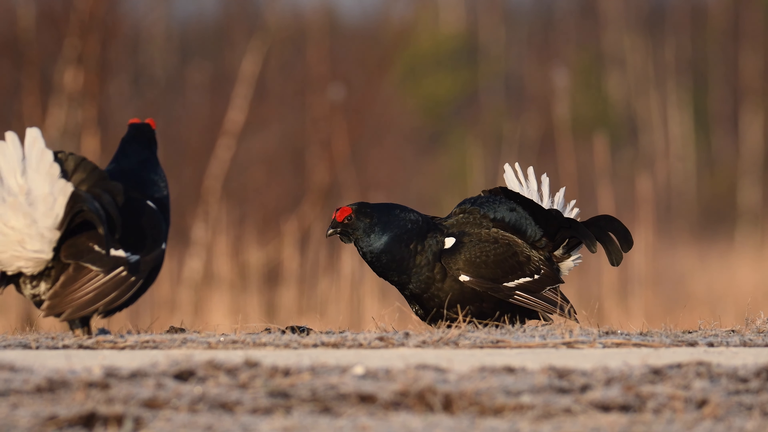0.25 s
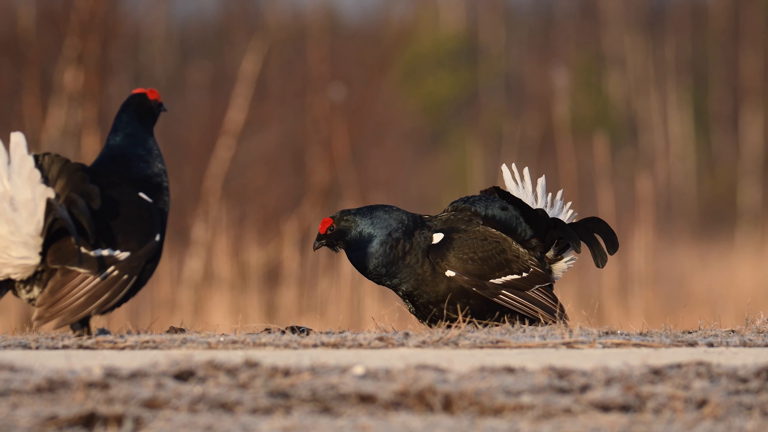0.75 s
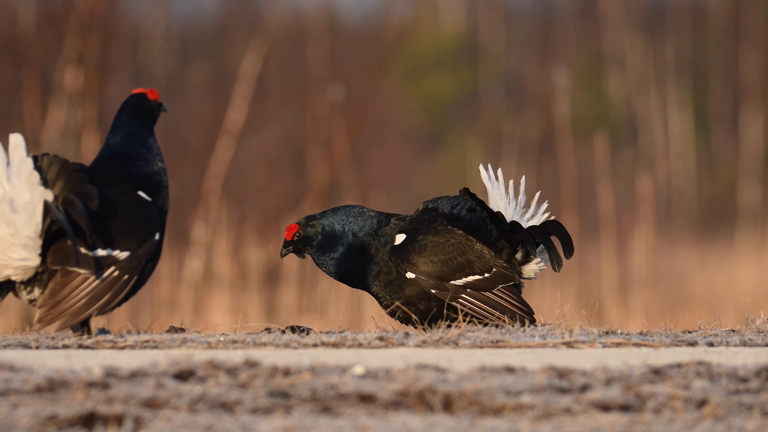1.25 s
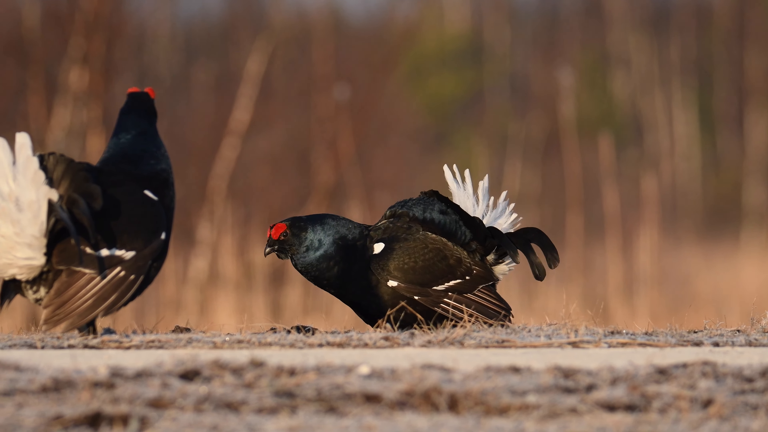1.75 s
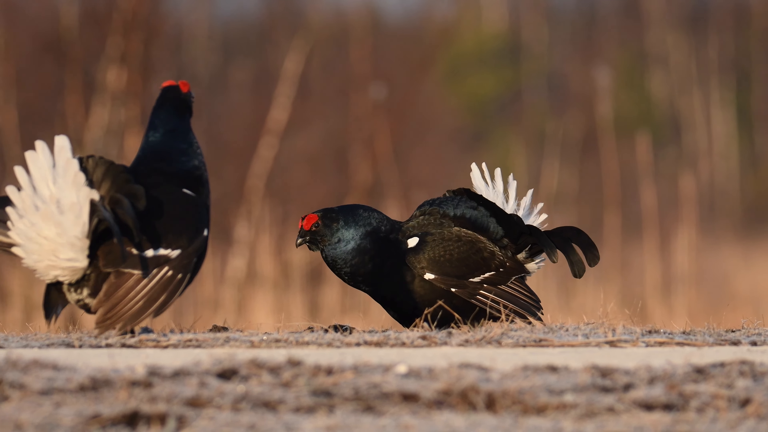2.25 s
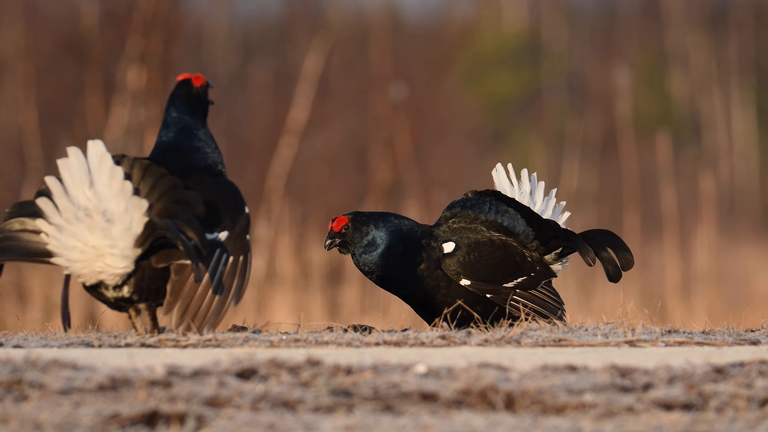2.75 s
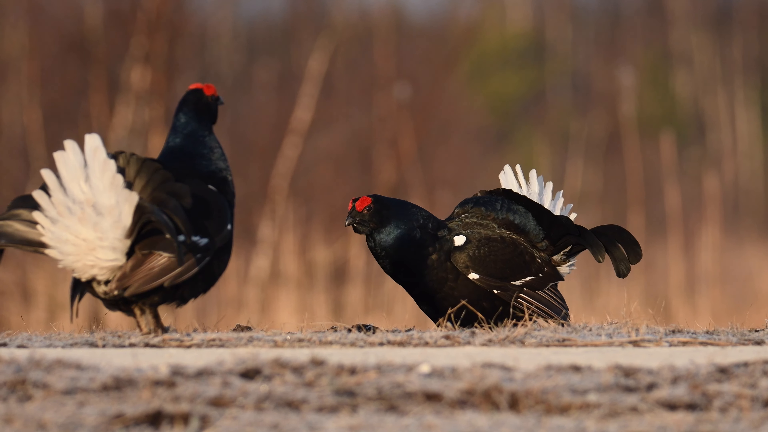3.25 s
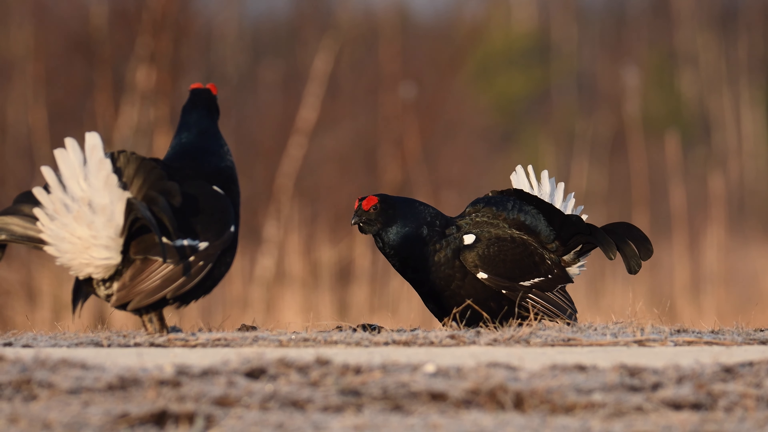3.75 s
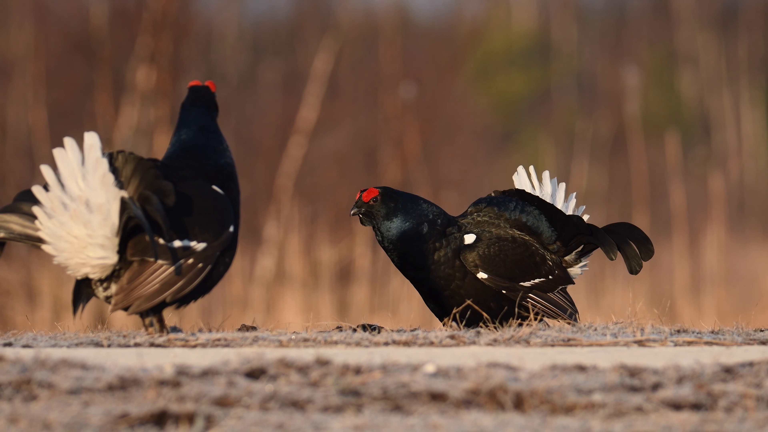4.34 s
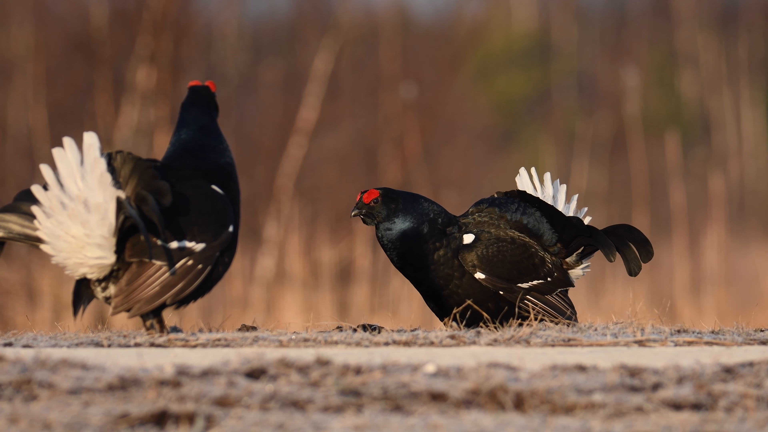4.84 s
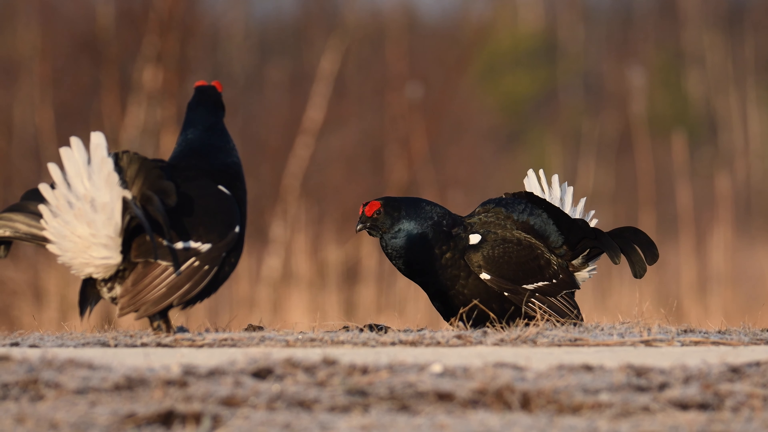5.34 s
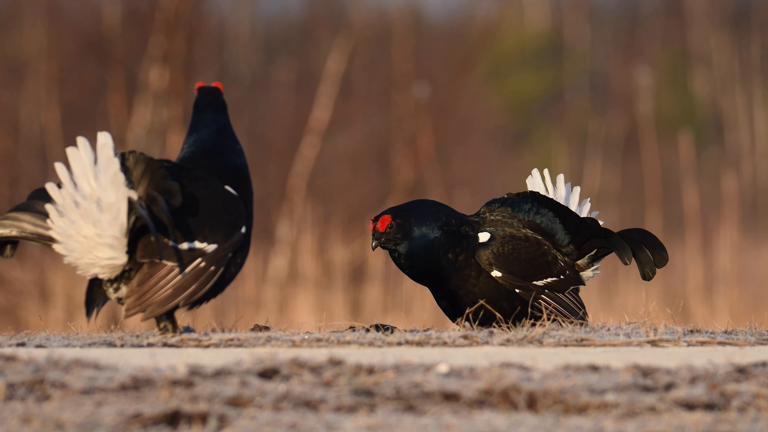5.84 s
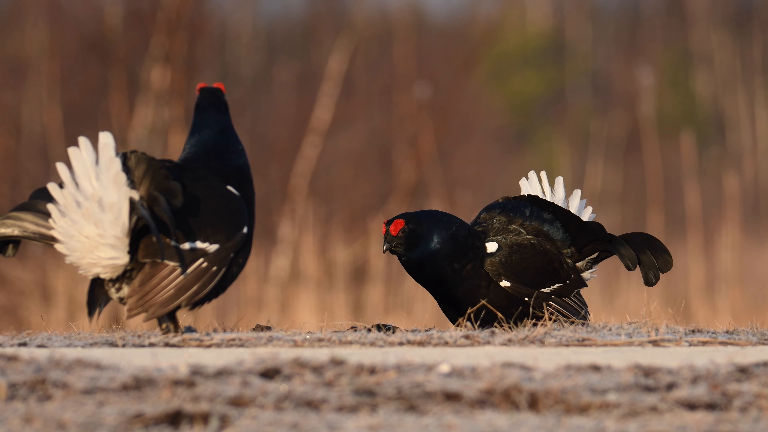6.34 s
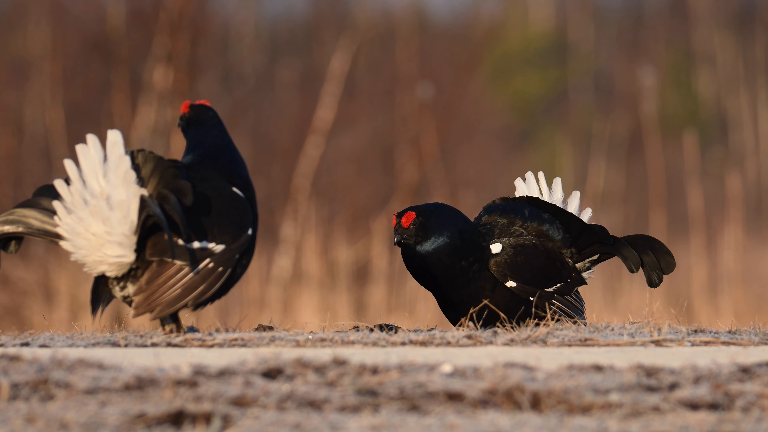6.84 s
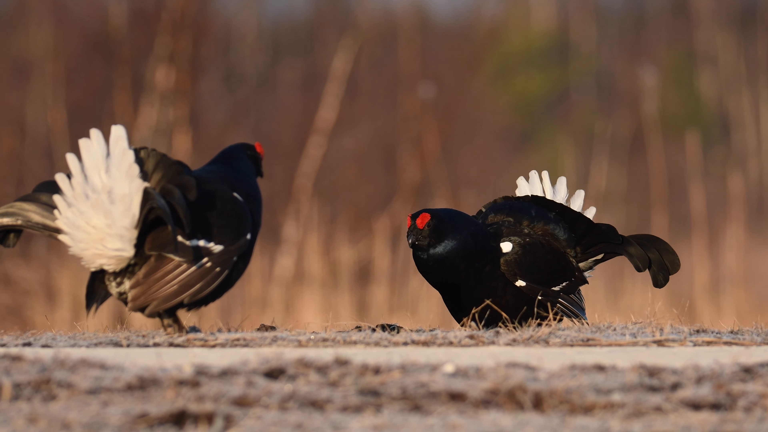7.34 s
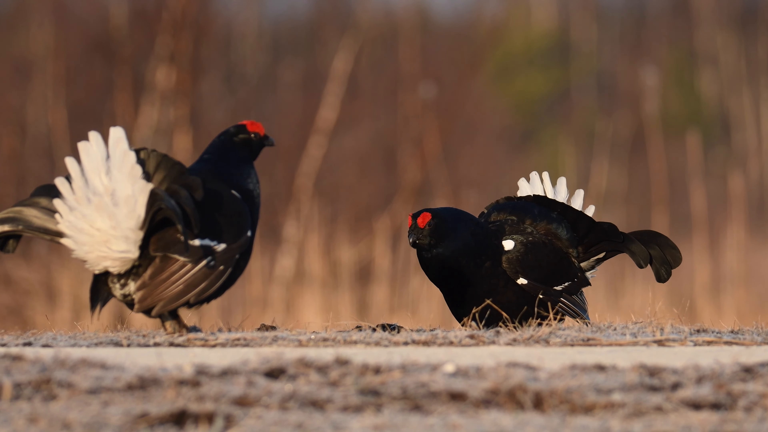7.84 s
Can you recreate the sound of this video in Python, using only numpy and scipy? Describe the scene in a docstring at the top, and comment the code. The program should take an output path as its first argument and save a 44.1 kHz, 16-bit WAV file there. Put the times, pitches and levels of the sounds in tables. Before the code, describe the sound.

Three near male grouse sing over each other, a little left of centre: even rolls of soft, round, low coos climb slightly and spill into quick bubbling phrases. About two and a half seconds in, one breathy hiss lasts just over half a second. Fainter birds bubble farther off. Open frosty ground, short soft echo, a stereo pair with low air rumble and hiss.

```python
"""Black grouse cocks at dawn

Open frosty ground, several cocks displaying left of the middle of a stereo pair of microphones.
Three near cocks overlap: even rolls of gliding coos climb in pitch into each bird's fixed closing figure.
Coos are arching tones rung through a throat sac; one blown hiss is noise through sliding resonances.
Farther cocks bubble faintly behind, over air rumble, microphone hiss and a thin electrical whine."""
import sys
import numpy as np
from scipy import signal
from scipy.fft import rfft, irfft
from scipy.io import wavfile

SR = 44100
rng = np.random.default_rng(int(sys.argv[2]) if len(sys.argv) > 2 else 0)


def transcribe(u):
    """Save the signal u as a 16-bit wav file named by the first command-line argument.

    u: samples, shape (n,) or (channels, n), limited to [-1, 1]; the rate is SR.
    q: integer samples, one column per channel.
    """
    v = np.clip(np.atleast_2d(u).T, -1, 1)
    q = np.round(v * 32767).astype(np.int16)
    wavfile.write(sys.argv[1], SR, q)


N = 356328


def amp(db):
    """dB to gain."""
    return 10 ** (np.asarray(db) / 20)


def rms_one(x):
    """Scale to unit rms."""
    return x / np.sqrt(np.mean(np.abs(x) ** 2) + 1e-20)


def in_time(rows):
    """Columns of a curve table, interpolated sample by sample."""
    s, *columns = np.transpose(rows)
    return [np.interp(np.arange(N) / SR, s, column) for column in columns]


def pan(x, db):
    """Left and right channels, the left db louder, around the same mean gain."""
    ratio = amp(db)
    return np.array([x * ratio, x]) * 2 / (1 + ratio)


def later(x, s):
    """Delay by s seconds."""
    return np.interp(np.arange(N) - s * SR, np.arange(N), x, left=0)


def band(x, low_hz, high_hz, kind="band", order=2):
    """Butterworth band filter."""
    sos = signal.butter(order, [low_hz, high_hz], kind, fs=SR, output="sos")
    return signal.sosfilt(sos, x)


# Overtones of one electrical tone. Each row: multiple of the tone, level in dB rms.
WHINE_OVERTONES = [(2, -91), (3, -93), (4, -93), (5, -95), (9, -101), (10, -100), (11, -100), (12, -101)]
WHINE_HZ = 1170.4


def whine():
    """Faint steady sine overtones from the electronics, the same in both channels."""
    t = np.arange(N) / SR
    out = 0
    for multiple, db in WHINE_OVERTONES:
        turns = round(multiple) * WHINE_HZ * t + rng.random()
        out = out + np.sqrt(2) * amp(db) * np.sin(2 * np.pi * turns)
    return out


# Steady floor at the microphones. Each row: frequency in Hz, level in dB per Hz,
# left-right likeness from 0 to 1.
FLOOR_SPECTRUM = [(14.8, -108, .4), (30.6, -101, 0.36), (73.5, -93.5, 0.47), (138, -93, 0.19),
                  (302, -94.5, 0.21), (534, -93, 0.046), (875, -100, 0.1), (2910, -104.5, 0.081),
                  (5830, -107.5, 0.0095), (6500, -110, .01), (7240, -114, 0.0084), (9900, -113, 0.0034),
                  (11800, -112, .01), (16600, -115, 0.012)]


def floor():
    """Spectrally shaped noise: air rumble partly shared by the channels, hiss almost separate in each."""
    hz = np.arange(N // 2 + 1) * SR / N + 1e-3
    at_hz, db, alike = np.transpose(FLOOR_SPECTRUM)
    db = np.interp(np.log(hz), np.log(at_hz), db)
    alike = np.interp(np.log(hz), np.log(at_hz), np.clip(alike, 0, 1))
    mid, side = rfft(rng.standard_normal((2, N))) * amp(db) * np.sqrt(SR / 4)
    mid = mid * np.sqrt(1 + alike)
    side = side * np.sqrt(1 - alike)
    return irfft(np.array([mid + side, mid - side]), N)


SWELL, SWELL_S = 0.68, 0.053   # power of the sine arch that shapes a coo; longer coos hold flatter


def coos(rows, pans_db):
    """Each coo is a pure tone whose pitch arches through three points under a smooth swell."""
    out = np.zeros((2, N))
    turns = rng.random(len(rows))
    for (s, length, first, middle, last, db), pan_db, turn in zip(rows, pans_db, turns):
        begin, end = int(s * SR) + 1, int((s + length) * SR)
        u = np.arange(begin, end + 1) / SR / length - s / length   # 0 to 1 through the coo
        # parabola through first, middle and last pitch
        hz = first * (1 - u) * (1 - 2 * u) + 4 * middle * u * (1 - u) + last * u * (2 * u - 1)
        swell = np.abs(np.sin(np.pi * u)) ** (SWELL * min(1, SWELL_S / length))
        tone = amp(db) * swell * np.sin(2 * np.pi * (np.cumsum(hz) / SR + turn))
        at = np.arange(max(begin, 0), min(end, N))
        out[:, at] += pan(tone[at - begin], pan_db)
    return out


# Loudness of the farther cocks together, before the low-pitch loss and the ground.
# Each row: time in seconds, gain in dB.
FAR_LEVEL = [(0, -54), (.2, -58), (.26, -90), (.36, -90), (.42, -57), (2.4, -58), (3.3, -59.5), (4.3, -61),
             (4.6, -66), (5.0, -59), (5.6, -62.5), (6.5, -56.5), (7.5, -56.5), (7.66, -78), (7.75, -54.5),
             (8.08, -56.5)]
FAR_PER_S, FAR_LOW_HZ, FAR_HIGH_HZ = 50.0, 349.9, 550.5   # mean coos per second; range of middle pitch
FAR_FALL, FAR_LENGTH_S = 0.21, 0.0403   # last pitch below the middle, as a share; length before variation
FAR_PAN_DB = 0.5


def far_cocks():
    """Distant bubbling: falling coos at random moments, pitches, strengths and sides."""
    gap, pitch, length, strength, side = rng.random((800, 5)).T
    start = np.minimum(np.cumsum(2 * gap / FAR_PER_S) - .05, N / SR)
    length_s = FAR_LENGTH_S * (.6 + length)
    hz = FAR_LOW_HZ * (FAR_HIGH_HZ / FAR_LOW_HZ) ** pitch
    rows = np.c_[start, length_s, hz * 1.05, hz, hz * (1 - FAR_FALL), 6.0 * strength]
    bubbling = coos(rows, FAR_PAN_DB + 19.0 * (side - .5))
    return amp(in_time(FAR_LEVEL)[0]) * rms_one(bubbling)


# Four sliding resonances of windpipe and beak. Each row: time in seconds, then for each resonance
# its centre in Hz and its gain in dB.
HISS_RESONANCES = [(2.56, 1900, -78, 2600, -78, 3500, -84, 4970, -88),
                   (2.575, 1850, -55, 2720, -62, 3460, -65.5, 4920, -76),
                   (2.64, 1758, -61, 2965, -61.5, 3450, -57, 4870, -68),
                   (2.72, 1636, -63, 2950, -66, 3495, -70, 5050, -75),
                   (2.775, 1610, -69, 2915, -68, 3500, -80, 5200, -77),
                   (2.82, 1610, -66, 2880, -67, 3520, -78, 5500, -74),
                   (2.9, 1660, -65.5, 2906, -74, 3510, -65, 5730, -70.5),
                   (3.05, 1935, -63.5, 2794, -73, 3560, -64.5, 5850, -63),
                   (3.11, 2300, -60, 2950, -58, 3350, -66, 5900, -66.5),
                   (3.165, 2450, -60, 2835, -61, 3200, -72, 5990, -73),
                   (3.2, 2440, -87, 2740, -83, 3100, -90, 5900, -95)]
# One value for each resonance: bandwidth of each of its two equal poles in Hz.
HISS_POLE_WIDTHS_HZ = [340, 400, 420, 1400]
# One value for each resonance: left over right in dB.
HISS_PANS_DB = [1, -1.5, -1.5, -2]
HISS_SPILL_DB, HISS_WIDE_DB = -10.5, -6   # breath between the resonances; scattered part


def blown_hiss():
    """Turbulent breath coloured by resonances that slide as neck and beak move."""
    curves = in_time(HISS_RESONANCES)
    out = 0
    for hz, db, width_hz, pan_db in zip(curves[::2], curves[1::2], HISS_POLE_WIDTHS_HZ, HISS_PANS_DB):
        r = np.exp(-np.pi * width_hz / SR)
        white = rng.standard_normal((3, N)) + 1j * rng.standard_normal((3, N))
        # narrow noise carried along the moving centre
        narrow = signal.lfilter([1], [1, -2 * r, r * r], white)
        carrier = np.exp(2j * np.pi * np.cumsum(hz) / SR)
        rung = rms_one((narrow * carrier).real)
        out = out + amp(db) * (pan(rung[0], pan_db) + amp(HISS_WIDE_DB) * rung[1:])
    effort = amp(curves[1]) + amp(curves[3]) + amp(curves[5])
    spill = rms_one(band(rng.standard_normal(N), 1900, 3540))
    out = out + amp(HISS_SPILL_DB) * effort * spill
    t = np.arange(N) / SR
    return out * (t > HISS_RESONANCES[0][0]) * (t < HISS_RESONANCES[-1][0])


# Even rolls of falling coos. Each row: first coo in seconds, last coo in seconds, spacing in seconds,
# coos from the end at mid-climb, low pitch in Hz, top pitch in Hz, low level in dB, top level in dB
# (before creep, variation and the throat sac), then for the top coo its length in seconds
# and its first and last pitch as ratios to its middle.
ROLL_SHAPES = [(0.027, 0.172, 0.0724, 4.2, 457, 595.6, -20, -31.5, 0.034, 1, 0.75),
               (0.8315, 1.422, 0.0737, 3.9, 445.6, 568.2, -39.5, -33, 0.07, 1.104, 0.79),
               (2.048, 2.6, 0.069, 3.66, 473, 583, -38.5, -39.5, 0.079, 0.99, 0.62),
               (2.143, 3.018, 0.0795, 3.72, 526, 597.4, -44, -31.5, 0.044, 0.936, 0.59),
               (4.399, 5.486, 0.0724, 3.24, 492, 601, -37.5, -36, 0.056, 0.94, 0.74),
               (4.903, 6.009, 0.0737, 3.62, 449.3, 565, -39, -31, 0.059, 1.073, 0.65),
               (6.393, 7.136, 0.0742, 2.4, 477, 601.4, -38, -37, 0.065, 1.09, 0.63)]
CLIMB_WIDTH_COOS = 0.73   # how gradually a roll climbs from low to top
CREEP_HZ, CREEP_DB = 3.0, .09   # slow gain from coo to coo
LOW_COO_S, LOW_ENTRY, LOW_EXIT = 0.049, 1.057, 0.84   # coo before the climb: length, end pitch ratios
LOW_VARY_DB = 3.0   # spread of the uneven coos before the climb


def rolls():
    """Evenly spaced coos creep up, then climb in pitch and change level over the last few."""
    rows = []
    for first_s, last_s, spacing, climb, low_hz, top_hz, low_db, top_db, *top_shape in ROLL_SHAPES:
        left = np.arange(round((last_s - first_s) / spacing) + 1)   # coos still to come
        up = 1 / (1 + np.exp((left - climb) / CLIMB_WIDTH_COOS))   # 0 low, 1 top
        hz = low_hz + (top_hz - low_hz) * up - CREEP_HZ * left
        low_shape = LOW_COO_S, LOW_ENTRY, LOW_EXIT
        length, entry, leave = [low + (top - low) * up for low, top in zip(low_shape, top_shape)]
        uneven_db = LOW_VARY_DB * (1 - up) * (rng.random(len(left)) - .5)
        db = low_db + (top_db - low_db) * up - CREEP_DB * left + uneven_db
        rows += list(np.c_[last_s - spacing * left, length, hz * entry, hz, hz * leave, db])
    return rows


# Closing figure of the song, one list for each of three near cocks. Each row: start in seconds from
# the figure's reference moment, length in seconds, first, middle and last pitch in Hz,
# peak level in dB; a rendition then changes times and level.
CLOSING_FIGURES = [
    [(-0.144, 0.076, 538, 538, 430, -36.5), (-0.08, 0.0133, 367, 457, 299, -35.5),
     (0.002, 0.0256, 546, 575, 323, -33.5), (0.109, 0.031, 439, 496, 686, -34),
     (0.155, 0.0256, 515, 592, 276, -29.5), (0.2, 0.065, 458, 522, 370, -36),
     (0.281, 0.0406, 307, 501, 682, -33), (0.322, 0.107, 599, 601.7, 614, -35),
     (0.423, 0.038, 601, 574.5, 495, -32.5), (0.515, 0.064, 540, 493, 480, -35),
     (0.575, 0.043, 438, 484, 430, -33.5), (0.628, 0.085, 437, 608.5, 323, -33),
     (0.739, 0.013, 660, 558, 603, -34), (0.804, 0.0492, 423.5, 582.3, 626, -33.5),
     (0.85, 0.017, 530, 594, 280, -29.5), (0.9, 0.052, 400, 588.5, 413, -30.5),
     (0.951, 0.023, 502, 602, 603, -35.3), (0.992, 0.026, 560, 586, 413, -30),
     (1.232, 0.021, 632, 592, 563, -37)],
    [(-0.147, 0.059, 538, 464.6, 544, -32.5), (-0.103, 0.027, 456, 481, 410, -29),
     (-0.001, 0.0287, 560, 552, 319, -29), (0.117, 0.0573, 398.5, 565.3, 522, -29.5),
     (0.154, 0.0202, 600, 499, 419, -31), (0.21, 0.052, 383, 482, 393, -31.5),
     (0.301, 0.036, 373, 577.4, 436, -28), (0.333, 0.086, 579, 608, 615, -37.5),
     (0.421, 0.031, 615, 570, 537, -28.5), (0.532, 0.033, 565, 557, 377, -31.5),
     (0.612, 0.048, 654, 596, 578, -33), (0.665, 0.0298, 638, 542, 316, -30.5),
     (0.733, 0.0403, 311, 523, 600, -37.1), (0.816, 0.052, 414, 565.7, 403, -35.5),
     (0.832, 0.0444, 533, 542, 380, -34), (0.903, 0.057, 388, 519.6, 395, -30.5),
     (0.959, 0.023, 543, 545, 657, -32.5), (0.984, 0.0527, 690, 508, 473, -31),
     (1.23, 0.0372, 588, 440, 307, -35)],
    [(-0.142, 0.097, 442, 507, 454, -34), (-0.082, 0.0235, 570, 440, 282, -40),
     (-0.012, 0.046, 395, 595, 557, -33.5), (0.107, 0.0518, 396, 528.5, 625, -34),
     (0.152, 0.0285, 557, 563, 280, -31.4), (0.208, 0.08, 458, 493, 401, -33.5),
     (0.285, 0.0727, 296, 596.6, 533, -36), (0.326, 0.0934, 558.6, 604.6, 609, -36.5),
     (0.427, 0.032, 636, 566, 527, -31.5), (0.55, 0.014, 630, 540, 543, -31.5),
     (0.588, 0.033, 421, 481, 435, -32.5), (0.641, 0.0607, 293, 645, 278, -34.5),
     (0.678, 0.028, 603, 567, 482, -31.5), (0.824, 0.045, 537.4, 562.5, 528, -33),
     (0.834, 0.044, 494, 574, 357, -29), (0.91, 0.058, 480, 556, 531, -35),
     (0.959, 0.033, 442, 542, 657, -31.5), (0.997, 0.036, 634, 577, 473, -28),
     (1.211, 0.02, 456, 555, 289, -27)],
]
# Renditions, one list for each cock. Each row: reference moment in seconds, slower in percent, louder in dB.
RENDITIONS = [
    [(0.615, -0.043, -1.84), (3.444, 0.4, -1.9), (7.612, -1.3, 0.4)],
    [(1.857, 0.49, -0.66), (6.459, 0.9, 0.76)],
    [(3.032, 1.5, -2), (5.931, 0.84, -4)],
]


def figures():
    """Each cock repeats its own figure, a little faster or slower, louder or softer."""
    rows = []
    for figure, renditions in zip(CLOSING_FIGURES, RENDITIONS):
        for s, slower, more_db in renditions:
            stretch = 1 + slower / 100
            for after, length, *hz, db in figure:
                rows.append((s + stretch * after, stretch * length, *hz, db + more_db))
    return rows


FLUTTER, FLUTTER_HZ = .16, 45   # unsteady airflow in the syrinx: rms depth, upper speed


def flutter():
    """Low-passed noise makes the loudness waver around 1."""
    sos = signal.butter(2, FLUTTER_HZ, fs=SR, output="sos")
    return 1 + FLUTTER * rms_one(signal.sosfilt(sos, rng.standard_normal(N)))


# More near coos, placed one by one, some of them the low beginnings of rolls. Each row: start in seconds,
# length in seconds, first, middle and last pitch in Hz, peak level in dB before variation and the throat sac.
PLACED_COOS = [(0.012, 0.022, 626, 620, 610, -37.5), (0.382, 0.099, 450, 400, 380, -41.5),
               (0.507, 0.07, 340, 403, 300, -45), (1.655, 0.027, 620, 605, 560, -47),
               (2.532, 0.021, 585, 560, 300, -32), (3.191, 0.038, 607, 448, 300, -36),
               (4.69, 0.056, 480, 439, 445, -37), (4.833, 0.036, 333, 403, 300, -37),
               (4.905, 0.06, 321, 478, 305, -33), (6.774, 0.043, 465, 461, 510, -33),
               (7.768, 0.025, 300, 457, 392, -33.5), (7.93, 0.025, 390, 435, 534, -32.5)]
NEAR_PAN_DB = 4.3   # the birds stand left of the middle
VARY_DB = 0.5   # spread in strength from coo to coo


def near_cocks():
    """Rolls, figures and more coos placed one by one, each varied slightly in strength and side."""
    rows = np.array(rolls() + figures() + list(PLACED_COOS))
    strength, side = rng.random((len(rows), 2)).T - .5
    rows[:, -1] += VARY_DB * strength
    return flutter() * coos(rows, NEAR_PAN_DB + 2.8 * side)


SAC_HZ, SAC_WIDTH_HZ, SAC_LOW_HZ = 563, 86, 305   # sac resonance; below the last it radiates weakly


def throat_sac(x):
    """The sac rings, so a coo flares as its pitch sweeps through the resonance."""
    r = np.exp(-np.pi * SAC_WIDTH_HZ / SR)
    feed = (1 - r * r) / 2 * np.array([1, 0, -1])
    ring = [1, -2 * r * np.cos(2 * np.pi * SAC_HZ / SR), r * r]
    return signal.lfilter(feed, ring, x + 1e-18)


def radiated(x):
    """A small sac couples poorly to the air at low pitch."""
    return signal.sosfilt(signal.butter(2, SAC_LOW_HZ, "high", fs=SR, output="sos"), x)


# Echoes from ground and tree line. Each row: left delay in seconds, right delay in seconds, gain in dB.
GROUND_ECHOES = [(.013, 0.023, -25), (.031, 0.024, -17)]
LEFT_LEAD_S = .00002
SCATTER_DB, SCATTER_T60_S = -18, 0.26   # diffuse return from brush and trunks


def ground(x):
    """Direct sound, a shade earlier on the left, two echoes and a short diffuse tail."""
    out = np.array([x[0], later(x[1], LEFT_LEAD_S)])
    for left_s, right_s, db in GROUND_ECHOES:
        out += amp(db) * np.array([later(x[0], left_s), later(x[1], right_s)])
    t = np.arange(SR // 2) / SR
    tail = rng.standard_normal((2, len(t))) * amp(-60 * t / SCATTER_T60_S)
    tail = rms_one(tail) / np.sqrt(len(t))   # unit energy
    return out + amp(SCATTER_DB) * signal.fftconvolve(x, tail, axes=1)[:, :N]


def scene():
    """All birds over the floor and whine; the coos also return from the ground."""
    cooing = throat_sac(near_cocks()) + far_cocks()
    return whine() + floor() + blown_hiss() + ground(radiated(cooing))


# Bands that the recorder does not pass. Each row: low edge in Hz, high edge in Hz.
TREBLE_GAPS = [(7400, 8050), (9150, 10050)]
CUTOFF_HZ = 15740


def record(dry):
    """The recorder drops two narrow treble bands and cuts the top steeply."""
    for low_hz, high_hz in TREBLE_GAPS:
        dry = band(dry, low_hz, high_hz, "bandstop", order=2)
    return signal.sosfilt(signal.ellip(14, .3, 70, CUTOFF_HZ, fs=SR, output="sos"), dry)


dry = scene()
out = record(dry)
transcribe(out)
```